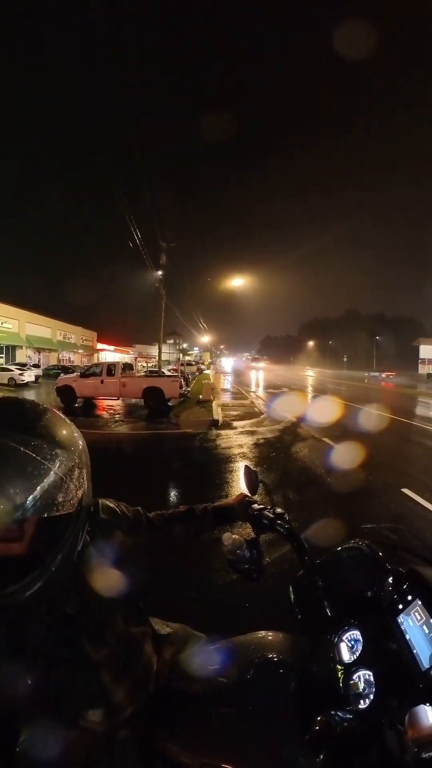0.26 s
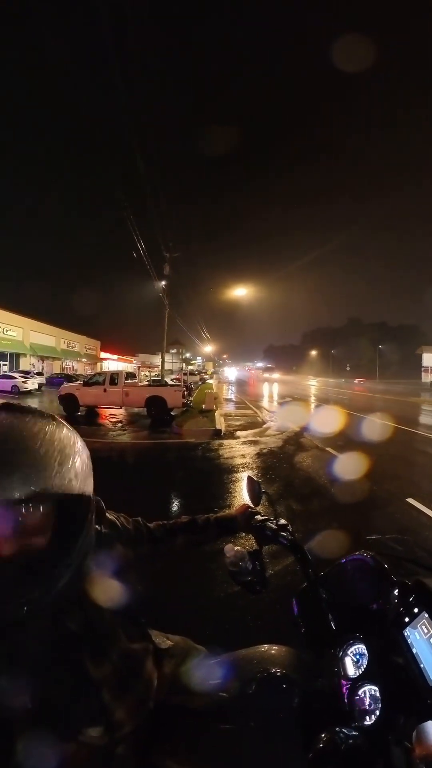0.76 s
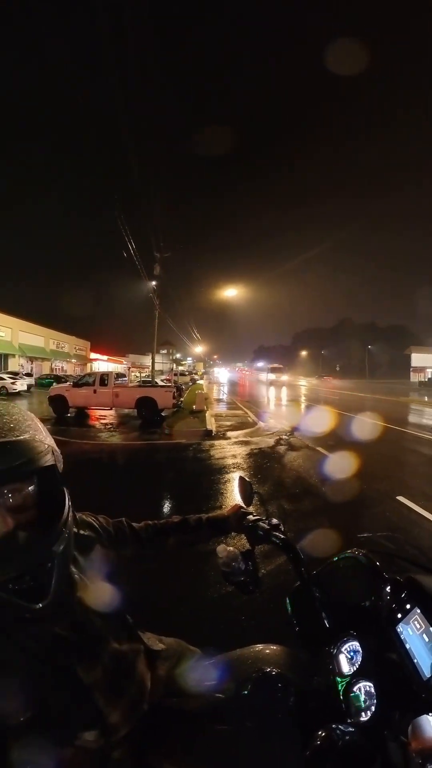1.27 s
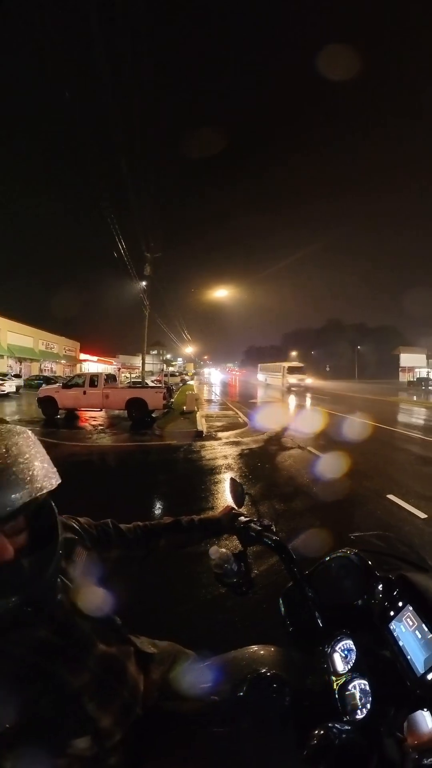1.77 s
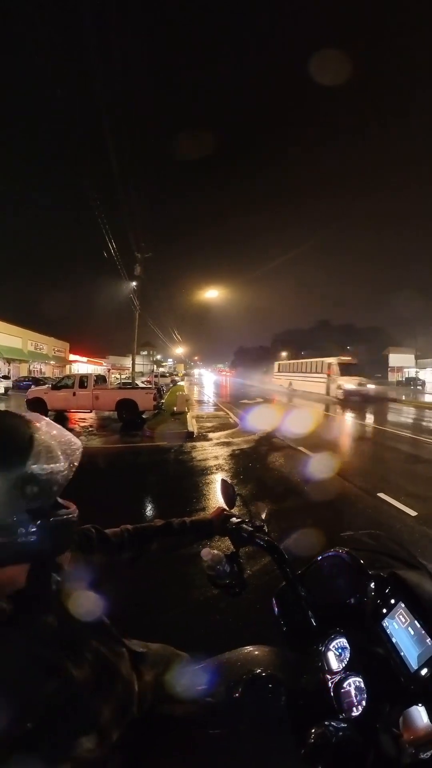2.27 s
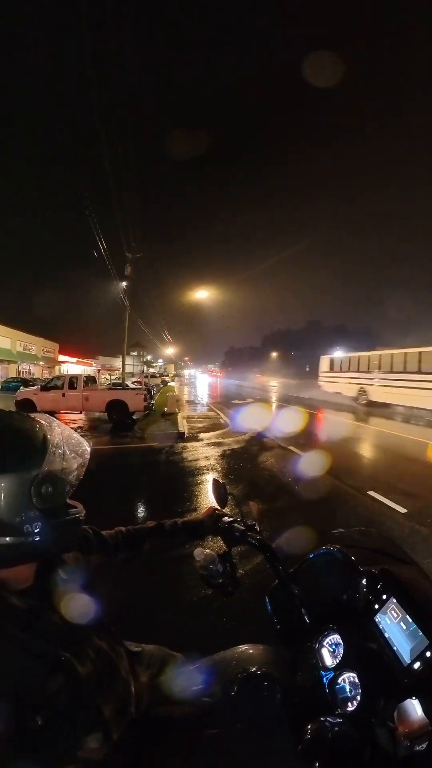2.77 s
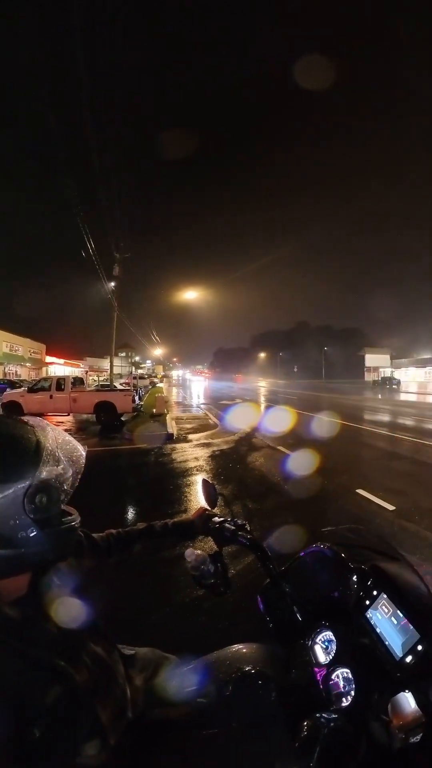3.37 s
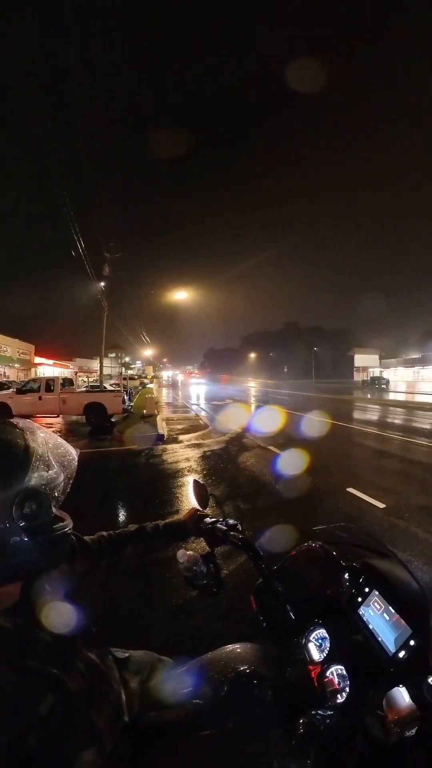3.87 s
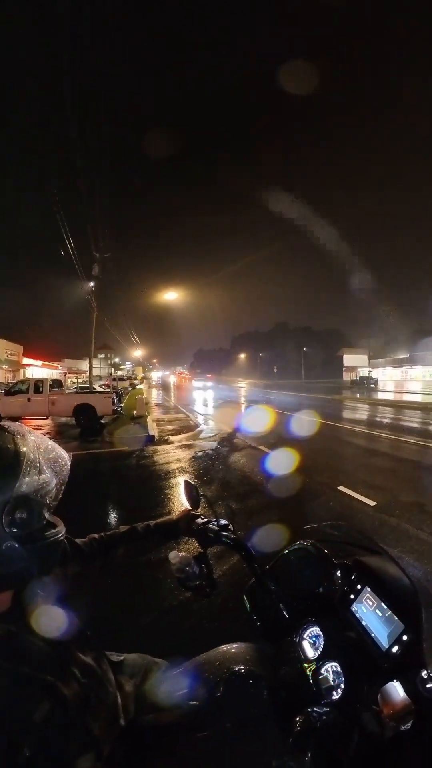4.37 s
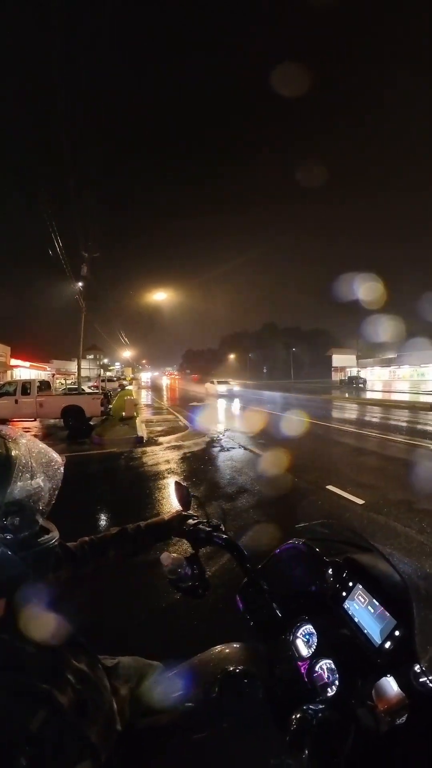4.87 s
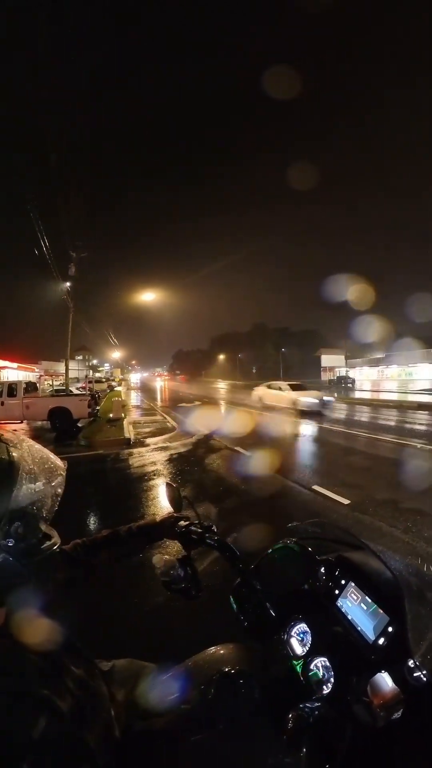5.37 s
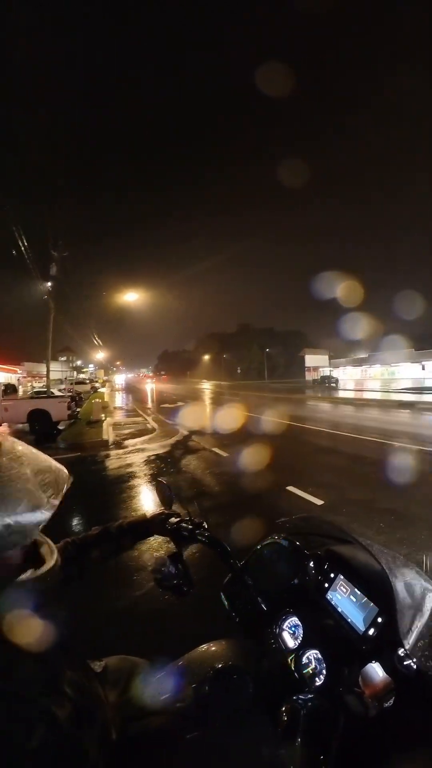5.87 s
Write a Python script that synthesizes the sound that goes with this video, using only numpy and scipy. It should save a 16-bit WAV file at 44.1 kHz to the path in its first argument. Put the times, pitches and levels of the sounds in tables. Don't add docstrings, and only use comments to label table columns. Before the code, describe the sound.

Lumpy low exhaust pulses from two idling motorcycles beat against each other, with irregular dull metallic taps. Wet tyre spray swells and fades over distant traffic rumble. Around the middle the nearer engine revs, its separate thuds merging into a rough, deep roar; it sags with popping bangs, revs again, and snaps up sharply before easing down. Heard very close, outdoors on a wet street, with bass in the middle and slightly wide hiss.

```python
import sys
import numpy as np
from scipy import signal
from scipy.io import wavfile
from scipy.ndimage import uniform_filter1d

SR = 44100
rng = np.random.default_rng(int(sys.argv[2]) if len(sys.argv) > 2 else 0)


def materialize(psi):
    bounded = np.clip(np.atleast_2d(psi).T, -1, 1)
    quanta = np.round(bounded * 32767).astype(np.int16)
    wavfile.write(sys.argv[1], SR, quanta)


def level_to_linear(level):
    exponent = np.asarray(level, float) / 20
    return 10 ** exponent


N = 270333

# time in seconds, firing cycles per second.
CRANK = [(0.0, 11.321), (0.89, 10.785), (1.07, 11.052), (2.81, 11.0), (3.312, 19.377), (3.449, 20.489),
         (3.896, 20.556), (4.104, 18.258), (4.42, 15.984), (4.555, 16.162), (4.756, 17.002),
         (5.122, 17.021), (5.301, 24.152), (5.424, 24.074), (5.557, 23.022), (5.791, 23.796),
         (5.937, 19.999), (6.13, 18.176)]
# opens in seconds, shuts in seconds, opening from 0 to 1.
THROTTLE = [
    (2.947, 3.942, 0.38),
    (4.325, 5.123, 0.47),
    (5.139, 5.352, 0.47),
    (5.375, 5.793, 0.78),
]
GRIP_S = 0.035
REAR_LAG = 315 / 720

# frequency in Hz, width in Hz, level in dB.
PIPE_MODES = [(113.7, 38.6, 0)]
PUNCH_MODES = [(138.7, 30, 0)]
BARK_MODES = [(227.8, 41, -4.5), (304, 19, -15)]
RASP_MODES = [(272, 44, -1), (335, 40, 0), (376, 34, -4)]
MOUTH_MODES = [(580, 260, 4), (930, 150, 7.5), (1198, 98, 1)]
COLLECTOR_MODES = [(57.6, 22.4, 0)]
EARLIER_MODES = [(116, 70, 0)]

# idle level in dB, gain when revved in dB,
# gain at full throttle in dB, gain while the speed swings hard in dB.
PIPE_LAW = (-22.5, -15, -3, 4)
PUNCH_LAW = (-39, 8, 0, 0)
BARK_LAW = (-45.5, 18, 10.5, -1)
MOUTH_LAW = (-70.5, 11, -2, 13.5)
THUMP_LAW = (-43, 13.5, 0, 9)
COLLECTOR_LAW = (-34, 15.5, -13, 3.5)

# start in seconds, end in seconds, change in dB.
FRONT_STARVES = (3.92, 4.6, -12)
REAR_STARVES = (5.82, 6.02, -8)

# firing order, level against the pipe's voice in dB.
NOTE_ORDERS = [(3, -8), (4, -5), (5, 0), (6, -11), (7, 0), (8, -6), (9, 0), (10, -5), (11, -9), (12, -5),
               (13, -8), (14, -1), (15, -11), (16, -4), (17, -6), (18, -1)]
# frequency in Hz, level in dB.
NOTE_VOICE = [(68, -4), (88, -6), (105, -1), (150, -3.5), (200, -8), (305, -17), (380, -23), (420, -45)]
# pressure trough in seconds, peak in dB.
BANGS = [(2.9, -23), (4.104, -10), (4.127, -12.5), (4.189, -9.5), (5.192, -15.5), (5.214, -12.5),
         (5.241, -12), (5.284, -9.5), (5.842, -11.5), (5.888, -17), (5.937, -19)]

# frequency in Hz, width in Hz, level in dB.
OTHER_PIPE_MODES = [(115, 62, -20.5), (198, 120, -60)]
OTHER_CASING_MODES = [(715, 65, -35), (940, 20, -57.5), (1330, 330, -62)]
# time in seconds, peak in dB.
KNOCKS = [(0.051, -35), (0.114, -31), (0.169, -29), (0.23, -35), (0.352, -29), (0.435, -30), (0.675, -38),
          (0.725, -29), (0.761, -30.5), (0.999, -29), (1.131, -34), (1.215, -30), (1.406, -44), (1.46, -40),
          (1.594, -26.5), (1.643, -34), (1.711, -42), (1.779, -27.5), (1.833, -26.5), (1.967, -28),
          (2.019, -28), (2.152, -29), (2.202, -26.5), (2.332, -24), (2.482, -29), (2.571, -29),
          (2.755, -25), (2.847, -33), (2.926, -38), (2.988, -34), (3.222, -43), (3.495, -36), (3.534, -39),
          (3.573, -36), (3.683, -33), (3.912, -31), (4.001, -31), (4.051, -33), (4.099, -31), (4.148, -32),
          (4.239, -28), (4.323, -36), (4.354, -38), (4.663, -44), (4.833, -32.5), (4.953, -33),
          (4.986, -33), (5.029, -33), (5.103, -38), (5.136, -36), (5.208, -36), (5.258, -44), (5.703, -37),
          (5.903, -32), (5.969, -37),
          (0.812, -31), (0.945, -28), (1.08, -38), (1.184, -31), (1.499, -32.5)]

# nearest in seconds, approach in seconds, leaving in seconds,
# spray in dB, fine spray in dB.
PASSES = [
    (1.1, 0.51, 1, -57.5, -92.5),
    (2.149, 0.93, 0.5, -50, -50.5),
    (2.8, 0.9, 0.4, -58, -52),
    (4.698, 0.8, 1, -68.5, -57.5),
    (5.659, 0.23, 0.21, -58.5, -57),
]
# time in seconds, length in seconds, rumble in dB, spray in dB.
SPLASHES = [(0.93, 0.066, 1.5, 3), (1.178, 0.026, 1, 1), (2.322, 0.042, 6, 5.5), (2.437, 0.046, -0.5, -1),
            (2.595, 0.092, -0.5, 4), (2.755, 0.077, 4.5, 5.5), (2.866, 0.026, 4, 4.5),
            (4.108, 0.28, 3.5, 1.5), (4.262, 0.022, 0, 2), (5.282, 0.006, 11.5, 5.5), (5.34, 0.079, -5, -4),
            (5.923, 0.1, -4.5, -2.5)]
# frequency in Hz, width in Hz, level in dB.
TREAD_MODES = [(3850, 990, 0)]
# frequency in Hz, level in dB per Hz.
SPRAY = [(820, -29), (1400, -4), (1900, -4.5), (3240, -7.5), (3920, -7.5), (6000, -13), (7800, -48.5),
         (13200, -120)]
MIST = [(2940, -60), (5000, -4), (6100, 0.5), (7520, 0.5), (11200, -13), (13600, -21.5), (14800, -35)]
RUMBLE = [(300, 6), (400, -1), (520, -1), (750, -1.15), (1000, -6.5), (1350, -8), (1500, -20), (2200, -20)]
GROWL = [(38, -5.5), (55, -2), (120, -7), (200, -1), (300, -13), (420, -43)]
# frequency in Hz, side against mid in dB.
WIDTH = [(2900, -3), (6800, -3), (7600, -9), (9000, -14), (11000, -20), (13000, -18), (15000, -8)]


def engine_state():
    s, cycles_per_s = np.transpose(CRANK)
    rate = uniform_filter1d(np.interp(np.arange(N) / SR, s, cycles_per_s), size=SR // 20)
    idle_rate, revved_rate = 11.8, 15.3
    revved = np.clip((rate - idle_rate) / (revved_rate - idle_rate), 0, 1)
    opening = sum(wide * between(opens, shuts) for opens, shuts, wide in THROTTLE)
    return rate, revved, np.clip(opening, 0, 1)


def motorcycle(rate, revved, opening):
    slope = np.gradient(rate) * SR
    hard_swing, slowing_share = 30, 0.87
    swing = np.clip(np.maximum(slope, -slowing_share * slope) / hard_swing, 0, 1)

    def law_db(law):
        idle, up, load, hard = law
        return idle + up * revved + load * opening + hard * swing

    def voice(sound, level_db):
        return rms_one(sound) * level_to_linear(level_db)

    cycle = -.03 + np.cumsum(rate) / SR
    rear_loss_db = starved(*REAR_STARVES)
    front_db = starved(*FRONT_STARVES)
    rear_db = -6.5 + 10 * revved + rear_loss_db
    scatter_db = 1.2 - .6 * revved + .05 * np.abs(slope) * (1 - opening)
    puffs = firings(cycle, front_db, rear_db, scatter_db, jitter_s=.0004)
    puffs = puffs / np.sqrt(rate * (level_to_linear(2 * front_db) + level_to_linear(2 * rear_db)))

    bark_db = law_db(BARK_LAW) - 8 * revved * np.clip(1 - 10 * opening, 0, 1)
    punch_db = law_db(PUNCH_LAW)
    boom = voice(resonate(puffs, PIPE_MODES), law_db(PIPE_LAW))
    punch = voice(resonate(puffs, PUNCH_MODES), punch_db)
    header = voice(resonate(puffs, [(194, 44, 0)]), punch_db + 2)
    bark = voice(resonate(puffs, BARK_MODES), bark_db)
    rasp = voice(resonate(puffs, RASP_MODES), bark_db - 5 + 1.5 * (rate - rate.max()))
    crack = voice(resonate(puffs, MOUTH_MODES), law_db(MOUTH_LAW))
    thump = voice(signal.fftconvolve(puffs, blast())[:N], law_db(THUMP_LAW))
    collector = voice(resonate(puffs, COLLECTOR_MODES), law_db(COLLECTOR_LAW))

    even = revved * (1 - .55 * swing) * level_to_linear(.4 * (front_db + rear_loss_db))
    pulses = (boom - punch - header - bark - rasp - collector + thump) * (1 - .9 * even)
    bike = pulses + even * note(cycle, rate, opening) + crack
    bike = bike + frame_throb(cycle, rate) + gear_whine(cycle, rate, opening)
    return bike, gas_rush(puffs)


def firings(cycle, front_db, rear_db, scatter_db, jitter_s):
    blow_lead_s = .007
    clicks, turns = np.zeros(N), np.arange(-1, 120)
    for lag, level_db in ((0, front_db), (REAR_LAG, rear_db)):
        luck = rng.standard_normal((len(turns), 2))
        at = np.interp(turns + lag, cycle, np.arange(N), left=-1, right=-1)
        inside = at >= 0
        shift_s = jitter_s * scatter_db[at.astype(int)] * luck[:, 0] - blow_lead_s
        at = (at + SR * shift_s).astype(int).clip(0, N - 1)
        inside &= at > 0
        clicks[at[inside]] = level_to_linear(level_db[at[inside]] + scatter_db[at[inside]] * luck[inside, 1])
    return clicks


def note(cycle, rate, opening):
    step = 8
    cycle, rate, opening = cycle[::step], rate[::step], opening[::step]
    out, flicker, wander = 0, drift(4.0)[::step], drift(1.5)[::step]
    lag_turns, lag_hz, lag_width_hz, lead_s = .42, 100, 40, .0031
    for order, level_db in NOTE_ORDERS:
        hz = order * rate
        shift = order * len(rate) // 19
        load_db = 14 * (opening - .6) * np.log2(np.maximum(hz / lag_hz / 1.5, 1))
        pipe_lag = lag_turns * (1 + np.tanh((hz - lag_hz) / lag_width_hz))
        turns = order * cycle + lead_s * hz - pipe_lag + .05 * np.roll(wander, shift)
        pair = np.angle(1 + .8 * np.exp(-2j * np.pi * order * REAR_LAG))
        gain = level_to_linear(-17 + level_db + at_hz(NOTE_VOICE, hz) + load_db + .8 * np.roll(flicker, shift))
        out = out + gain * np.cos(2 * np.pi * turns + pair)
    return signal.resample_poly(out, step, 1)[:N]


def frame_throb(cycle, rate):
    throb_hz, width_hz = 52, 22
    return level_to_linear(-26) * np.sin(10 * np.pi * cycle) / (1 + ((5 * rate - throb_hz) / width_hz) ** 2)


def gear_whine(cycle, rate, opening):
    whine_db = -62.5 + 13.5 * opening * np.clip(rate - 22.5, 0, 1)
    return level_to_linear(whine_db + 3 * drift(15)) * np.sin(2 * np.pi * 51.5 * cycle + 1.2 * drift(14))


def gas_rush(puffs):
    fade = np.exp(-1 / (.006 * SR))
    breath = signal.lfilter([1], [1, -2 * fade, fade * fade], puffs)
    return breath / uniform_filter1d(breath, SR // 4)


def blast():
    start_hz, end_hz, sag_s, peak_s, delay_s = 220, 90, .008, .005, .002
    t = np.maximum(np.arange(SR // 25) / SR - delay_s, 0)
    turns = end_hz * t + (start_hz - end_hz) * sag_s * (1 - np.exp(-t / sag_s))
    return (t * np.exp(-t / peak_s)) ** 2 * np.sin(2 * np.pi * turns)


def bangs():
    (s, level_db), clicks = np.transpose(BANGS), np.zeros(N)
    trough_s = 0.00576
    clicks[((s - trough_s) * SR).astype(int)] = level_to_linear(level_db)
    pulse = blast() / np.abs(blast()).max()
    return signal.fftconvolve(clicks, pulse)[:N] + level_to_linear(-30) * resonate(clicks, MOUTH_MODES)


def earlier_puff():
    lead, click = int(.0047 * SR), np.zeros(N)
    click[0] = 1
    ring = np.append(resonate(click, EARLIER_MODES)[lead:], np.zeros(lead))
    return level_to_linear(-12) * ring / np.abs(ring).max()


def second_twin(duck):
    t, flat = np.arange(N) / SR, np.ones(N)
    cycle = .13 + 10.82 * t
    boom = -resonate(firings(cycle, 0 * flat, -1.5 * flat, 2 * flat, jitter_s=0.00023), OTHER_PIPE_MODES)
    taps = firings(cycle, -3 * flat, -3 * flat, 2.8 * flat, jitter_s=0.00023)
    s, peak_db = np.transpose(KNOCKS)
    taps[((s - .002) * SR).astype(int)] += level_to_linear(peak_db + 38.5)
    drone = level_to_linear(-33 + 2 * drift(5.0)) * np.sin(2 * np.pi * 113.6 * t + .5 * drift(1.0))
    throb = level_to_linear(-28 + drift(0.5)) * np.sin(2 * np.pi * (54.0 * t + .51))
    return duck * (boom + drone + throb) + resonate(taps, OTHER_CASING_MODES)


def street(breath, duck):
    rumble_gain, spray_gain, mist_gain = traffic()
    gust = level_to_linear(.6 * drift(3.1))
    spray = banded_noise(SPRAY, 6, shared_db=0.5, own_db=2.2, own_rate=16) * spray_gain
    mist = banded_noise(MIST, 10, shared_db=0.7, own_db=2.1, own_rate=16) * mist_gain
    tread = rms_one(resonate(rng.standard_normal(N), TREAD_MODES))
    tread = tread * level_to_linear(-13 + 1.5 * drift(8.0)) * spray_gain
    rumble = banded_noise(RUMBLE, 4, shared_db=-0.87, own_db=0.0, own_rate=16) * rumble_gain * gust
    growl = banded_noise(GROWL, 2, shared_db=0.5, own_db=2.0, own_rate=2.2) * level_to_linear(-27) * duck
    pulsed = .2
    hiss = (spray + mist) * gust * (1.0 + 0.0056 * breath)
    return tread + growl + rumble * (1 - pulsed + pulsed * breath) + hiss


def traffic():
    t = np.arange(N) / SR
    spray_power, mist_power = level_to_linear(2 * -53.5), level_to_linear(2 * -61)
    for s, coming, going, spray_db, mist_db in PASSES:
        near = 1 / (1 + ((t - s) / np.where(t < s, coming, going)) ** 2) ** 2
        spray_power = spray_power + level_to_linear(2 * spray_db) * near
        mist_power = mist_power + level_to_linear(2 * mist_db) * near
    low_db, high_db = sum(np.outer(db, np.exp(-((t - s) / length) ** 2)) for s, length, *db in SPLASHES)
    return level_to_linear(-40.5 + low_db), np.sqrt(spray_power) * level_to_linear(high_db), np.sqrt(mist_power) * level_to_linear(0.42 * high_db)


def banded_noise(spectrum, per_octave, shared_db, own_db, own_rate):
    low_hz, high_hz = spectrum[0][0], spectrum[-1][0]
    edges = np.geomspace(low_hz, high_hz, int(per_octave * np.log2(high_hz / low_hz)) + 2)
    out, together, white = 0, drift(16.0), rng.standard_normal((2, 2, N))
    for k, (low, high) in enumerate(zip(edges, edges[1:])):
        band_pass = signal.butter(2, [low, high], "band", fs=SR, output="sos")
        band = signal.sosfilt(band_pass, white[k % 2])
        hz = np.sqrt(low * high)
        gain = level_to_linear(at_hz(spectrum, hz) + shared_db * together + own_db * drift(own_rate))
        out = out + gain * band * [[1], [level_to_linear(at_hz(WIDTH, hz))]]
    return out / np.sqrt(np.mean(out[0] ** 2))


def resonate(x, modes):
    out = np.zeros(N)
    for k, (hz, width, level_db) in enumerate(modes):
        r = np.exp(-np.pi * width / SR)
        section = [(1 - r * r) / 2, 0, -(1 - r * r) / 2, 1, -2 * r * np.cos(2 * np.pi * hz / SR), r * r]
        ring = signal.sosfilt([section, section], x + 1e-18)
        out += level_to_linear(level_db) * (-1) ** k * ring * SR / width / 6
    return out


def between(start, stop):
    t = np.arange(N) / SR
    return np.clip(np.minimum(t - start, stop - t) / GRIP_S + .5, 0, 1)


def starved(starves, recovers, level_db):
    return level_db * between(starves, recovers)


def drift(rate):
    r = np.exp(-80 * np.pi * rate / SR)
    slow = signal.lfilter([1], [1, -2 * r, r * r], rng.standard_normal(N // 40 + 2002))[2000:]
    return np.interp(np.arange(N) / 40, np.arange(len(slow)), rms_one(slow))


def rms_one(x):
    return x / np.sqrt(np.mean(x ** 2) + 1e-20)


def at_hz(points, hz):
    known_hz, level = np.transpose(points)
    return np.interp(np.log(hz), np.log(known_hz), level)


def scene():
    rate, revved, opening = engine_state()
    duck = level_to_linear(-7 * revved)
    bike, breath = motorcycle(rate, revved, opening)
    mid, side = street(breath, duck)
    mid = mid + bike + bangs() + earlier_puff() + second_twin(duck)
    return np.array([mid + side, mid - side])


def top_cut(x):
    return signal.sosfilt(signal.butter(12, 14920, fs=SR, output="sos"), x)


def record(dry):
    bass_cut_hz, mono_below_hz, peak_room = 33, 3050, .9
    bass_cut = signal.butter(6, bass_cut_hz, "high", fs=SR, output="sos")
    mid = signal.sosfilt(bass_cut, dry.mean(axis=0))
    mid = peak_room * np.tanh(mid / peak_room)
    treble = signal.cheby2(14, 70, mono_below_hz - 100, "high", fs=SR, output="sos")
    side = signal.sosfilt(treble, (dry[0] - dry[1]) / 2)
    return top_cut(np.array([mid + side, mid - side]))


dry = scene()
out = record(dry)
materialize(out)
```